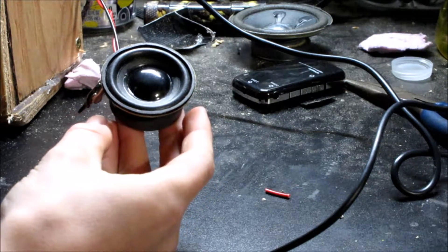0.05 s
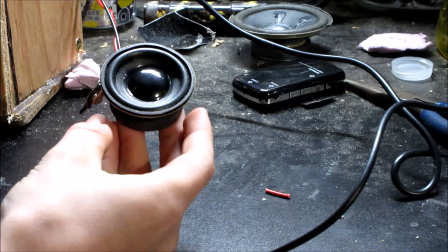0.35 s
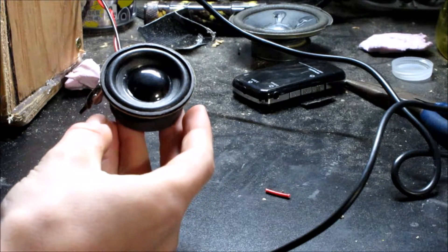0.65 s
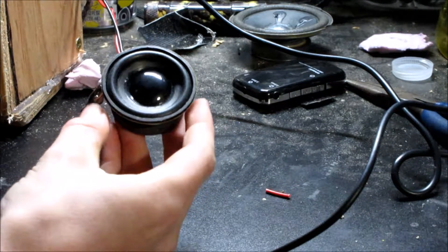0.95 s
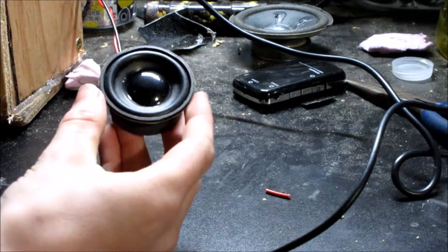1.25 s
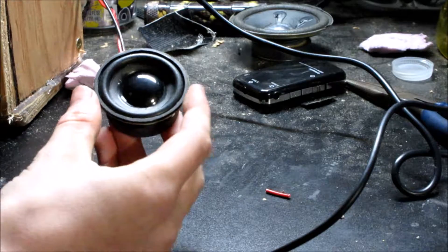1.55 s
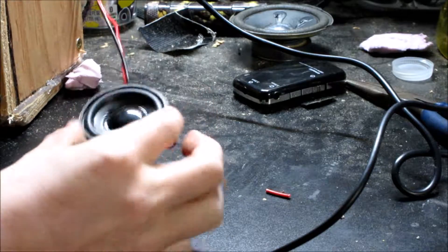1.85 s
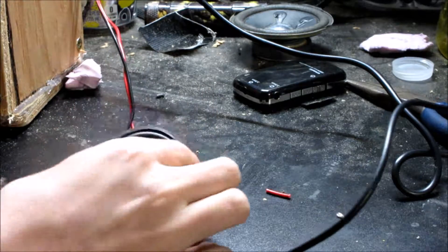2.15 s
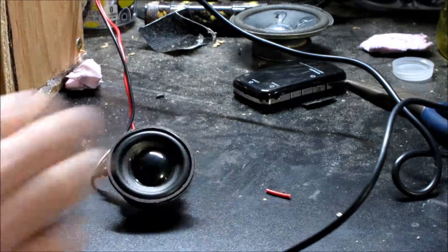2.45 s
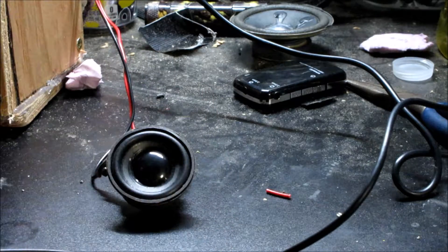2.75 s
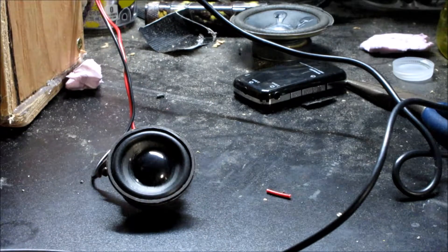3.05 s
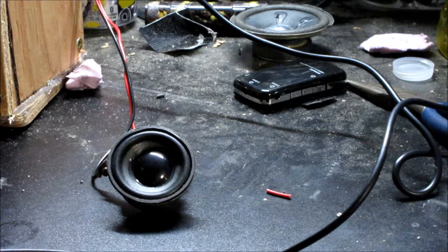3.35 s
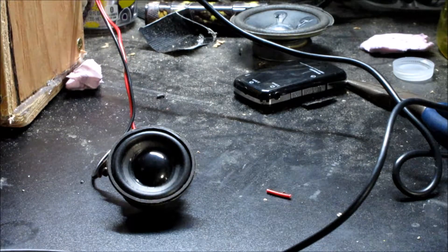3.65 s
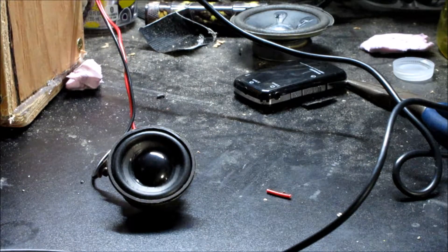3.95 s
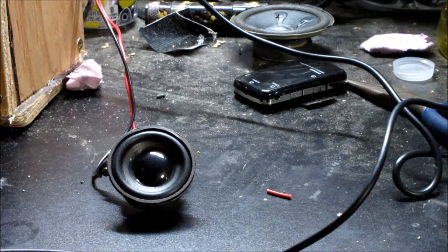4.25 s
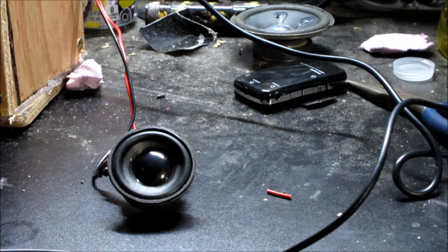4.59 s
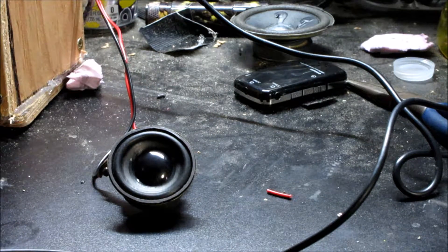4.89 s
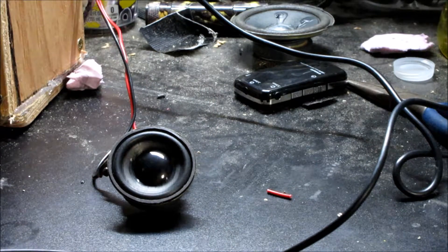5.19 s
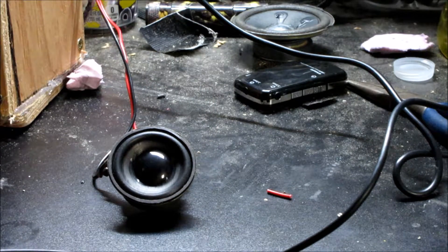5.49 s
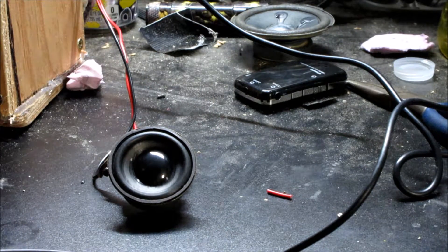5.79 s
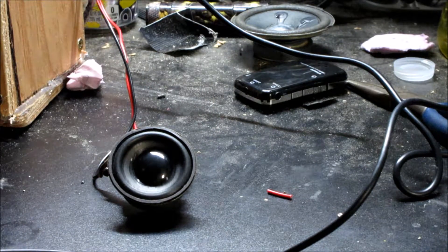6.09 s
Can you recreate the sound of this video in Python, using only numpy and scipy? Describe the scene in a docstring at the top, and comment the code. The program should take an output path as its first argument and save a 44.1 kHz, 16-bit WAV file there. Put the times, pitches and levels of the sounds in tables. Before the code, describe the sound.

Sharp, uneven clicks and a raspy buzz from a tiny loudspeaker, turning to dull rattling against a bench over faint hiss.

```python
"""Overdriven bare loudspeaker

A small speaker, driven far below its range, only buzzes and cracks: the cone ticks at each end of
its travel and now and then bottoms out. It is held in the hand, then set down on a workbench,
where it later shudders and drums. Amplifier hiss and a low rumble lie underneath."""
import sys
import numpy as np
from scipy import signal
from scipy.fft import rfft, irfft, next_fast_len
from scipy.io import wavfile
from scipy.ndimage import uniform_filter1d

SR = 44100
rng = np.random.default_rng(int(sys.argv[2]) if len(sys.argv) > 2 else 0)


def generate_wav(sig):
    """Save sig (samples, or channels by samples) to the path in sys.argv[1] as 16-bit PCM at SR."""
    pcm = np.round(np.clip(np.atleast_2d(sig).T, -1, 1) * 32767).astype(np.int16)
    wavfile.write(sys.argv[1], SR, pcm)


N = 270333
TIME = np.arange(N) / SR
LANDING_S = 2.251  # in the hand before, on the bench after

# Hard cracks. Each row: start in seconds, ring level in dB, ring in Hz, then push, snap, grit and
# rebound in relative dB.
CRACKS = [(0.3947, -15.5, 5000, -14, -5, -21, -6.5), (0.573, -26.5, 4970, -5, -8, -3, -20),
          (0.6266, -23.5, 4940, -6, -10, -4, -15), (0.6786, -26, 4830, -11, -9, 4, -11),
          (0.763, -16.5, 4120, -34, -10, 9, -27), (0.844, -13, 5560, -14, -8.5, 23, -20),
          (0.8571, -10.5, 5050, -14, -5, -3, -29), (0.8814, -8.5, 5270, -13.5, -11.5, 7, -24),
          (0.965, -13.5, 4770, -22, -25, 11, -11), (1.0371, -13.5, 5200, -11.5, -13, 9, -7.5),
          (1.2187, -12.5, 5170, -11.5, -16, 22, -6), (1.256, -9.5, 5100, -10, -33, -1, -7.5),
          (1.3287, -8, 5030, -17.5, -41, -1, -11), (1.4906, -8, 4300, -16.5, -3, -17, -12.5),
          (1.6549, -9, 5830, -14, -9.5, -9, -15.5), (1.8397, -9.5, 5300, -7, -5.5, -4, -16),
          (1.9828, -5.5, 4870, -12.5, -12.5, -6, -16), (2.1278, -8.5, 4700, -12.5, -11, -8.5, -13.5),
          (2.4802, -4, 5040, -17, -11, -7.5, -22), (2.5168, -9, 5040, -14, -6.5, -17, -26),
          (2.6996, -8, 4500, -13, -7, -18.5, -22), (2.9178, -10, 4100, -13, -5.5, -10, -17),
          (2.9537, -11, 5500, -8.5, -14, -11, -15), (3.1368, -9, 4360, -8, -8.5, -16, -24),
          (3.1715, -11.5, 5400, -10, -5.5, -27, -28), (3.2485, -9, 4650, -14.5, -8, -7, -23),
          (3.6443, -11.5, 5200, -7, -15, -13, -15), (3.788, -9, 5220, -12, -8, -24, -34),
          (3.8258, -18.5, 4650, -11, -8.5, -11, -17), (3.8608, -14.5, 5100, -10, -9, -20, -35),
          (4.0049, -12.5, 5500, -8, -9, -21, -30), (4.151, -9.5, 4930, -10.5, -9.5, -12, -41),
          (4.261, -12, 5330, -10, -12, -15, -29), (4.3803, -27.5, 4990, -6, -5, -16, -20),
          (4.396, -15.5, 4700, -9, -12, -25, -35)]
# Spells of grazing the stop. Each row: start and end in seconds, ring level in dB, ring in Hz, then
# push, snap and grit in relative dB.
RATTLES = [(0, .06, -26, 4640, -12, -23, 8), (2.25, 2.45, -31.5, 4450, -7, -24, 12),
           (3.30, 3.32, -41.5, 4030, 9.5, -15, -8), (3.41, 3.61, -32, 5100, -2.5, -12.5, 2)]


def blows(rebound_push_db=-4.5, rebound_snap_db=-3, spread_db=2):
    """The cone hits its stop and rebounds, or grazes it: rows of (s, dB, Hz, push, snap, grit dB)."""
    rows = []
    for s, db, hz, push_db, snap_db, grit_db, rebound_db in CRACKS:
        # a rebound grinds in the hand and ticks cleanly on the bench
        delay_s, rebound_grit_db = (.009, 10) if s < LANDING_S else (.0178, -8)
        rows.append((s, db, hz, push_db, snap_db, grit_db))
        rows.append((s + delay_s, db + rebound_db, hz, rebound_push_db, rebound_snap_db, rebound_grit_db))
    for start_s, end_s, db, *colour in RATTLES:
        for s, touch_db, decay_s in contacts():
            if start_s < s < end_s:
                rows.append((s + decay_s / 2, db + touch_db + spread_db * rng.standard_normal(), *colour))
    return rows


def cracks(push_trim_db=.5, snap_trim_db=3, grit_trim_db=3.5, rise_s=.0011, decay_s=.0023, size=900):
    """The coil grinds into its stop: the dome rings briefly over a short push and a bright snap."""
    out, lead = np.zeros(N), size // 4
    t = (np.arange(size) - lead) / SR
    friction = np.exp(np.minimum(t / rise_s, -t / decay_s))
    for s, db, ring_hz, push_db, snap_db, grit_db in blows():
        scrape = unit_energy(rng.standard_normal(size) * friction * (t != 0))
        blow = signal.unit_impulse(size, lead) + from_db(grit_db + grit_trim_db) * scrape
        ring = resonance(blow, ring_hz, width_hz=1300)
        lowest_mode = from_db(-10.5) * resonance(blow, 463, width_hz=100)
        push = cut(resonance(blow, 1400, width_hz=1800) - lowest_mode, 330, "high")
        top_hz = 10500 if s < LANDING_S else 12500  # fingers damp the snap
        snap = cut(cut(blow, 9000, "high", order=1), top_hz, "low", order=4)
        # neighbouring modes swing in opposite directions
        sound = from_db(push_db + push_trim_db) * unit_energy(push) - unit_energy(ring)
        sound += from_db(snap_db + snap_trim_db) * unit_energy(snap)
        add(out, s - lead / SR, from_db(db) * np.sqrt(SR / 1000) * sound)  # level over 1 ms
    return out


# Stretches of drive. Each row: start in seconds, swing rate in Hz, return contact as a share of a swing.
DRIVE = [(.019, 36.72, .72), (2.2225, 27.5, .49), (4.4107, 55, .49)]
# Contacts per stretch. Each row: outward and return scrape decay in seconds, return level in dB.
SCRAPES = [(.0024, 0.00036, -6), (0.0015, .0018, -5), (0.0015, 0.0016, -4)]


def contacts(tilt_from_s=.88, side_share=.38, side_db=-2.5, side_decay_s=.00195):
    """Every swing touches going out and coming back: rows of (s, dB, scrape decay s)."""
    rows = []
    ends_s = [start_s for start_s, _, _ in DRIVE[1:]] + [N / SR]
    for (start_s, rate_hz, back_share), end_s, scrape in zip(DRIVE, ends_s, SCRAPES):
        out_decay_s, back_decay_s, back_db = scrape
        for s in np.arange(start_s, end_s, 1 / rate_hz):
            rows += [(s, 0, out_decay_s), (s + back_share / rate_hz, back_db, back_decay_s)]
            if tilt_from_s < s < LANDING_S:  # tilted, the coil also touches the side of its gap
                rows.append((s + side_share / rate_hz, side_db, side_decay_s))
    return rows


# Buzz level. Each row: time in seconds, body and rasp in relative dB.
BUZZ_LEVELS = [(0, -44, -47), (.51, -45, -44.5), (1.14, -45, -39.5), (1.33, -44.5, -41), (1.52, -51.5, -48),
               (1.89, -50.5, -43.5), (2.05, -57, -47.5), (2.36, -51, -52.5), (2.71, -61.5, -55),
               (3.3, -60.5, -62), (3.76, -59.5, -63.5), (4.2, -60, -58.5), (4.45, -55, -55.5),
               (4.88, -55, -50.5), (5.07, -50.5, -58), (5.5, -55, -48), (5.79, -48.5, -48),
               (6.13, -50.5, -45.5)]
# Swells of harder rubbing. Each row: centre and half length in seconds, boost in dB.
RUBS = [(-0.014, 0.05, 13), (1.726, 0.033, 4), (5.212, 0.049, 11.5)]
# Low, middle and high modes of cone and frame. Each row: centre in Hz, width in Hz, gain in dB.
BODY_MODES = [(334.4, 86, 0.5), (416, 108, -3), (576, 101, 1), (850, 175, -2.5), (1136, 81, 4.5),
              (1302, 45, 3), (1595, 97, -8.5)]
RASP_MODES = [(2014, 1700, -6.5), (3290, 1920, 1), (3806, 1190, 2.5), (4100, 396, 1), (5370, 1430, -3)]
SIZZLE_MODES = [(8500, 2170, 2.5), (11650, 4800, -1.5), (14040, 2500, 3)]


def buzz(body_trim_db=2, rasp_trim_db=3, sizzle_trim_db=-4.5, grain_db=8.5, uneven_db=1.2, size=900):
    """Each contact gives a tick and a gritty scrape; the coil rubs faintly in between."""
    ticks, scrapes, t = np.zeros(N), np.zeros(N), np.arange(size) / SR
    for s, db, decay_s in contacts():
        force = from_db(db + uneven_db * rng.standard_normal())
        grit = rng.standard_normal(size) * from_db(grain_db * rng.standard_normal(size))
        add(ticks, s + decay_s / 2, np.array([force]))
        add(scrapes, s, force * unit_energy(grit * np.sqrt(t) * np.exp(-t / decay_s)))
    scrapes += from_db(-42) * rng.standard_normal(N) * from_db(grain_db * rng.standard_normal(N))
    body_db, rasp_db = in_time(BUZZ_LEVELS)
    rasp_db += sum(db * np.exp(-((TIME - s) / half_s) ** 2) for s, half_s, db in RUBS)
    turn_loss_db = np.interp(TIME, [1.3, 2], [0, 3.5])  # the cone is turned away and lowered
    bright = scrapes + from_db(-7) * ticks  # the treble is mostly friction
    body = cut(resonances(scrapes + ticks, BODY_MODES), 3500, "low")
    rasp = cut(resonances(bright, RASP_MODES), 5500, "low", order=4)
    sizzle = cut(resonances(bright, SIZZLE_MODES), 4000, "high")
    sizzle = cut(sizzle, 11800, "low", order=6)
    return (from_db(body_db + body_trim_db) * evened(body)
            + from_db(rasp_db + rasp_trim_db) * evened(rasp)
            + from_db(rasp_db - turn_loss_db + sizzle_trim_db) * evened(sizzle))


# Landing knocks. Each row: start in seconds, level in dB.
KNOCKS = [(2.251, -21), (2.2575, -46), (2.305, -41), (2.313, -48), (2.326, -38.5)]
# Modes of a knock. Each row: frequency in Hz, gain in dB, T60 in seconds.
KNOCK_MODES = [(240, -5.5, 0.039), (332, -7.5, 0.089), (406, -19.5, 0.26), (569, -6.5, 0.079),
               (696, -5.5, 0.019), (904, 2.5, 0.051), (1187, -6.5, 0.11), (1280, -4, 0.027),
               (1620, 3, 0.014), (2330, -5, 0.023), (2710, -4, 0.021)]


def set_down(size=14000):
    """The frame lands on the bench with a dull knock and rocks to rest."""
    out, t = np.zeros(N), np.arange(size) / SR
    for s, db in KNOCKS:
        for k, (hz, mode_db, t60_s) in enumerate(KNOCK_MODES):
            envelope = from_db(db + mode_db - 60 * t / t60_s)
            add(out, s, (-1) ** k * envelope * np.sin(2 * np.pi * hz * t))
    return out


# Shudders on the bench. Each row: start in seconds, relative level in dB.
SHUDDERS = [(3.866, -9), (4.4234, -8), (4.5336, -7), (4.969, -3.5), (5.6258, -0.5), (5.842, 0)]
# Taps of one shudder. Each row: delay in seconds, relative level in dB.
TAPS = [(0, -8.5), (.007, -5.5), (0.013, -6), (.025, -7)]
# Modes of the shaken frame. Each row: centre in Hz, width in Hz, gain in dB.
SHUDDER_MODES = [(194, 10, 0.5), (346, 26.4, 5.5), (536, 157, -4.5), (792, 67, -3.5), (1066, 133, -4.5),
                 (1580, 630, -13.5), (4470, 1800, -16)]


def shudders(gain_db=16, scuff_gain=.6, scuff_decay_s=.0097, size=900):
    """The speaker jiggles against the bench in quick groups of dull taps."""
    taps, t = np.zeros(N), np.arange(size) / SR
    for s, db in SHUDDERS:
        for delay_s, tap_db in TAPS:
            scuff = unit_energy(rng.standard_normal(size) * np.exp(-t / scuff_decay_s))
            tap = signal.unit_impulse(size) + scuff_gain * scuff
            add(taps, s + delay_s, from_db(gain_db + db + tap_db) * tap)
    return resonances(taps, SHUDDER_MODES)


# Drumming level. Each row: time in seconds, level in dB.
DRONE_LEVELS = [(4.42, -53), (4.8, -58), (5.07, -52), (5.3, -53.5), (5.5, -50), (6.13, -48.5)]
# Modes of the drumming frame. Each row: centre in Hz, width in Hz, gain in dB.
DRONE_MODES = [(161, 9, -3), (236, 50, -3), (270, 24, 0), (322, 40, 1), (450, 120, 1), (570, 110, -1),
               (1115, 30, 3), (5250, 700, -9)]


def drone(lag_s=.0014, uneven_db=2.1, back_db=-8):
    """At the fastest drive the frame drums on the bench, firm then light, making a low buzzing pitch."""
    touches = np.zeros(N)
    start_s, rate_hz, back_share = DRIVE[-1]
    for s in np.arange(start_s + lag_s, N / SR, 1 / rate_hz):
        firm, light = from_db(uneven_db * rng.standard_normal((2, 1)))
        add(touches, s, firm)
        add(touches, s + back_share / rate_hz, from_db(back_db) * light)
    frame = resonances(touches, DRONE_MODES)
    return from_db(in_time(DRONE_LEVELS)[0]) * frame / frame[TIME > start_s].std()


# Echoes from the bench and nearby things. Each row: delay in seconds, gain in dB before colouring.
ECHOES = [(.0031, -60), (.0037, -11), (.0048, -10), (.0071, -18.5)]


def workshop(x, tail_db=-13.5, t60_s=.14, size=15000):
    """Direct sound, a few coloured echoes from close by and a short diffuse tail."""
    echoes, t = np.zeros(size), np.arange(size) / SR
    for s, db in ECHOES:
        echoes[round(s * SR)] += from_db(db)
    early = resonance(echoes, 3700, width_hz=2400)
    tail = rng.standard_normal(size) * from_db(-60 * t / t60_s) * (t > .0008)
    tail = from_db(tail_db) * unit_energy(cut(tail, 4000, "low", order=1))
    return signal.fftconvolve(x, signal.unit_impulse(size) + early + tail)[:N]


# Amplifier noise. Each row: frequency in Hz, relative density in dB.
HISS_SPECTRUM = [(100, -9.5), (330, 9.5), (780, 0), (1150, 3.5), (2000, 3), (4500, 1), (7500, -9.5),
                 (14000, -14)]


def hiss(level_db=-55):
    """The amplifier hisses steadily."""
    return from_db(level_db) * noise(HISS_SPECTRUM)


# Low rumble. Each row: frequency in Hz, relative density in dB.
RUMBLE_SPECTRUM = [(15, -31), (30, -7), (48, -1), (90, -3.5), (150, -6), (260, -6.5), (600, -34)]
# Rumble level. Each row: time in seconds, relative level in dB.
RUMBLE_LEVELS = [(0.0, -61.5), (1.96, -64), (3.4, -86), (3.69, -74), (4.22, -78), (6.13, -74)]


def rumble(gain_db=6):
    """Low rumble, loudest while the speaker is handled; it dips, then partly recovers."""
    return from_db(in_time(RUMBLE_LEVELS)[0] + gain_db) * noise(RUMBLE_SPECTRUM)


def from_db(db):
    """Decibels to gain."""
    return 10 ** (np.asarray(db) / 20)


def in_time(rows):
    """Each column of a curve, at every sample."""
    s, *columns = np.transpose(rows)
    return [np.interp(TIME, s, column) for column in columns]


def add(out, s, sound):
    """Mix a short sound in at time s."""
    at = max(round(s * SR), 0)
    out[at:at + len(sound)] += sound[:max(N - at, 0)]


def unit_energy(x):
    """Scale so that the squares sum to one."""
    return x / np.sqrt(np.sum(x ** 2) + 1e-20)


def evened(x, size=4800):
    """Hold the slow level at rms 1 and keep the fast grain."""
    power = uniform_filter1d(uniform_filter1d(x ** 2, size), size // 2)
    return x / np.sqrt(np.abs(power) + 1e-20)


def resonance(x, hz, width_hz):
    """Two-pole band-pass with peak gain 1."""
    r = np.exp(-np.pi * width_hz / SR)
    feedforward = np.array([1, 0, -1]) * (1 - r * r) / 2
    feedback = [1, -2 * r * np.cos(2 * np.pi * hz / SR), r * r]
    return signal.lfilter(feedforward, feedback, x + 1e-18)


def resonances(x, modes):
    """Parallel resonances with alternating signs."""
    return sum((-1) ** k * from_db(db) * resonance(x, hz, width_hz)
               for k, (hz, width_hz, db) in enumerate(modes))


def cut(x, hz, kind, order=2):
    """Butterworth filter."""
    return signal.sosfilt(signal.butter(order, hz, kind, fs=SR, output="sos"), x)


def noise(spectrum):
    """Steady noise of a given colour, rms 1."""
    hz, db = np.transpose(spectrum)
    size = next_fast_len(N)
    bins_hz = np.fft.rfftfreq(size, 1 / SR)
    gain = from_db(np.interp(np.log(bins_hz + 1), np.log(hz), db))
    x = irfft(rfft(rng.standard_normal(size)) * gain, size)[:N]
    return x / x.std()


def scene():
    """The speaker in the workshop, over rumble and hiss; mono."""
    speaker = workshop(cracks() + buzz() + drone() + set_down() + shudders())
    return (speaker + rumble() + hiss())[None]


def record(dry, clip_level=.82, cutoff_hz=15000):
    """The loudest cracks overload the input; the top is cut."""
    clipped = np.clip(dry, -clip_level, clip_level)
    return signal.sosfilt(signal.ellip(8, .3, 60, cutoff_hz, fs=SR, output="sos"), clipped)


dry = scene()
out = record(dry)
generate_wav(out)
```